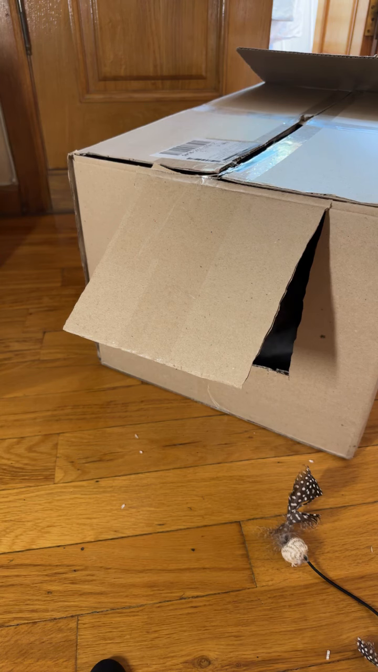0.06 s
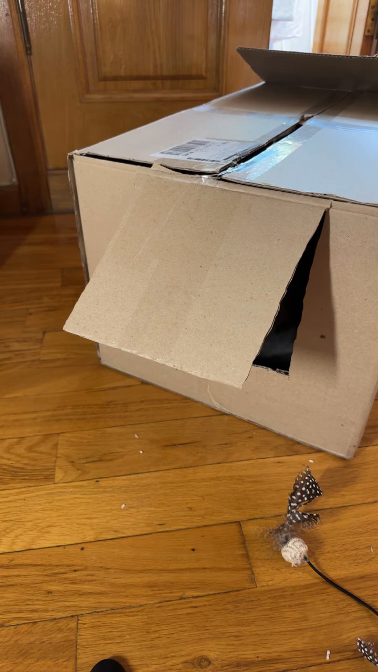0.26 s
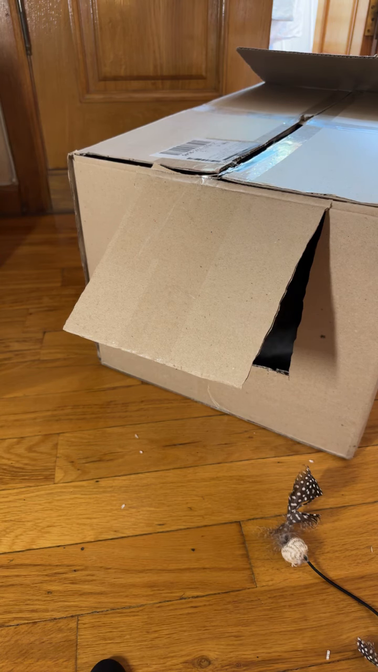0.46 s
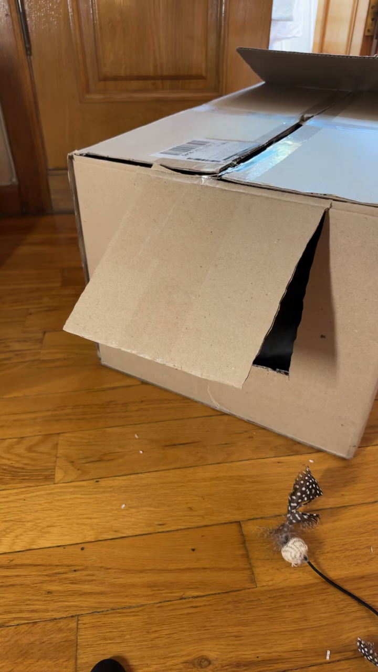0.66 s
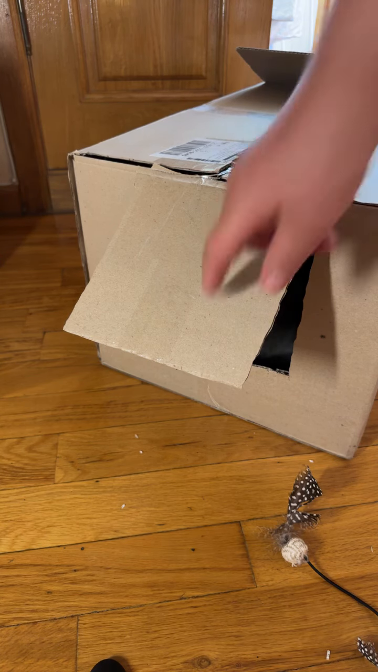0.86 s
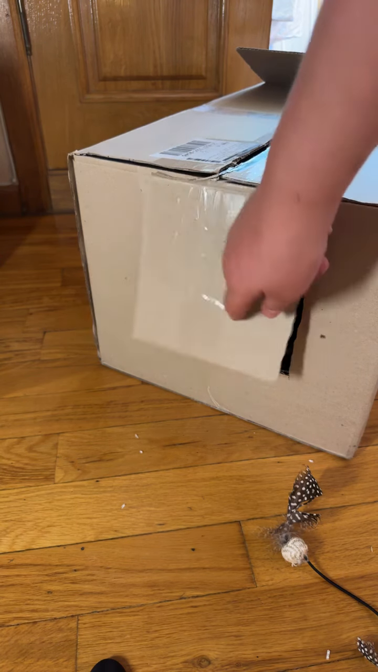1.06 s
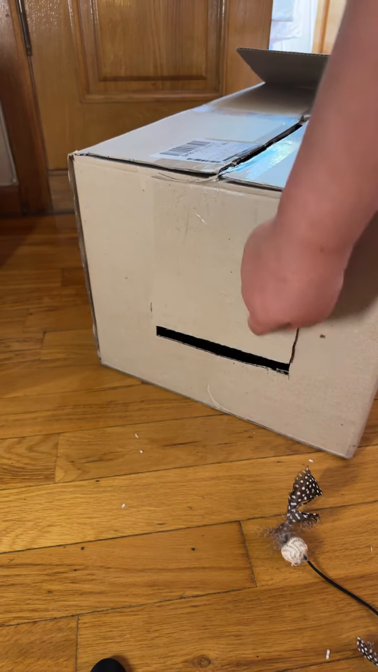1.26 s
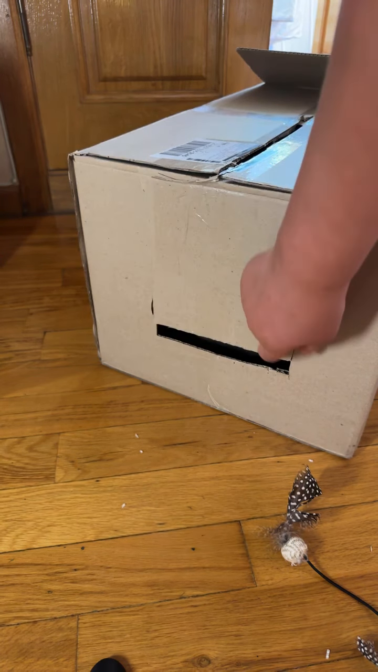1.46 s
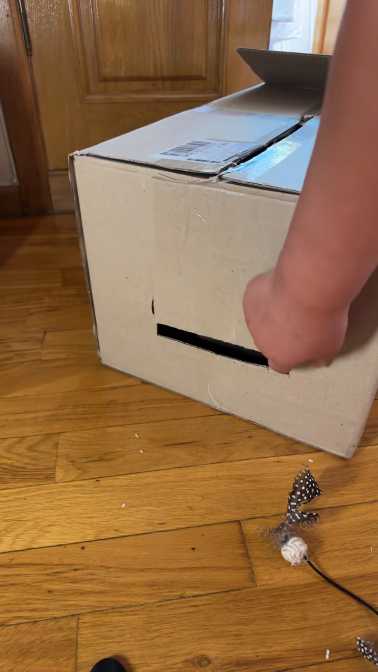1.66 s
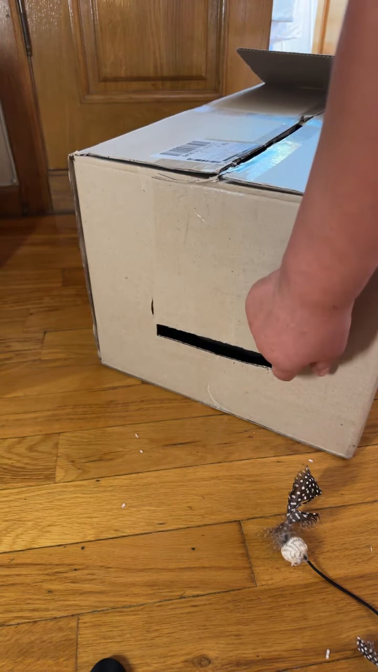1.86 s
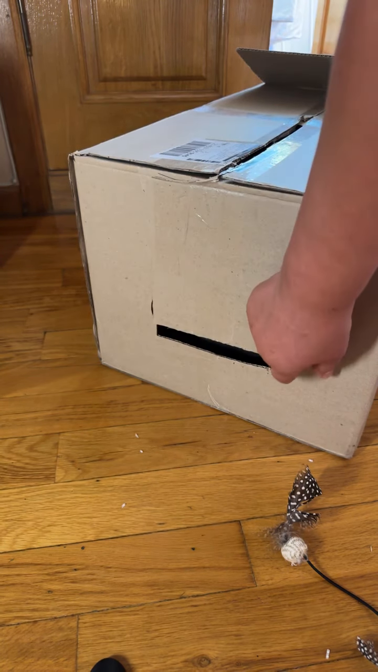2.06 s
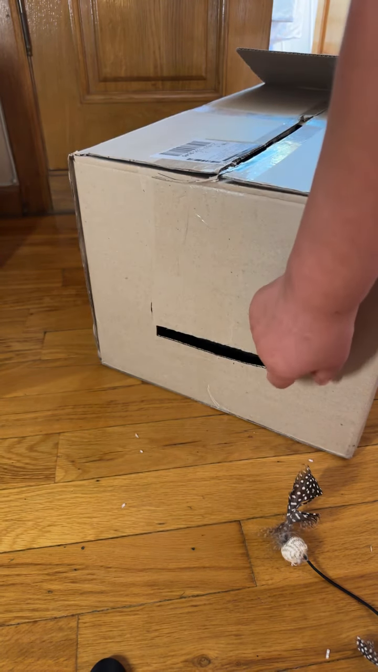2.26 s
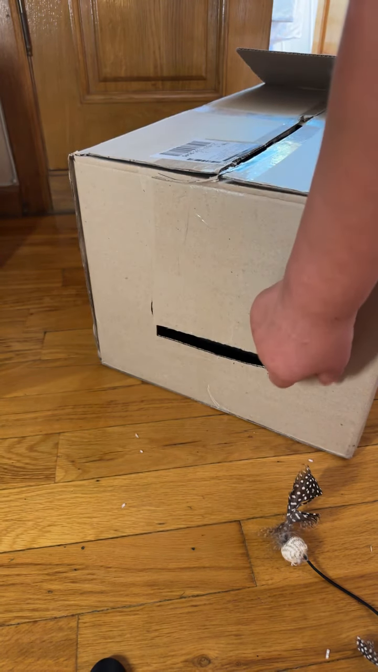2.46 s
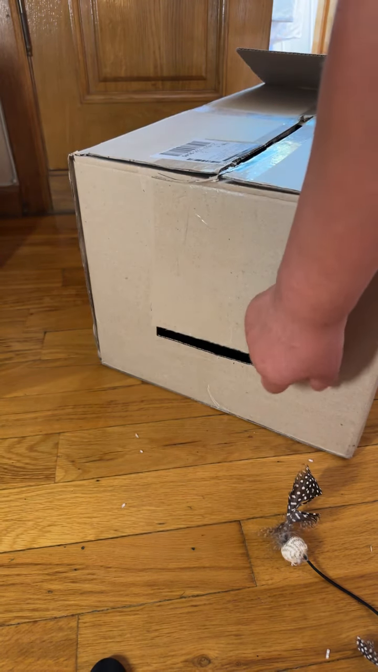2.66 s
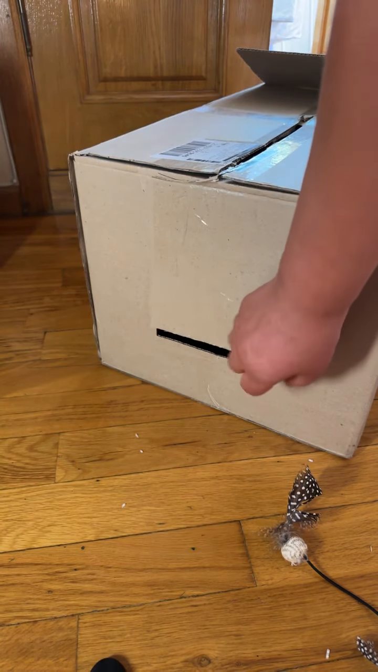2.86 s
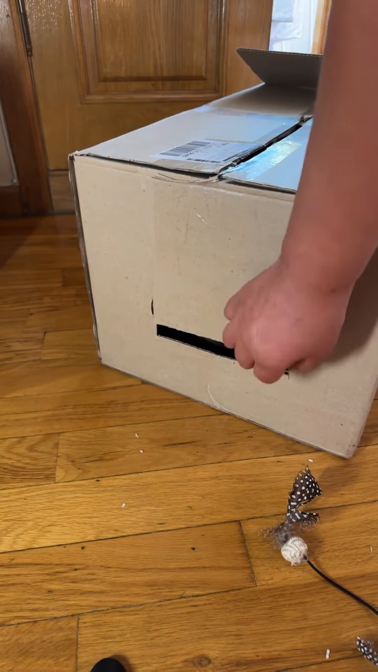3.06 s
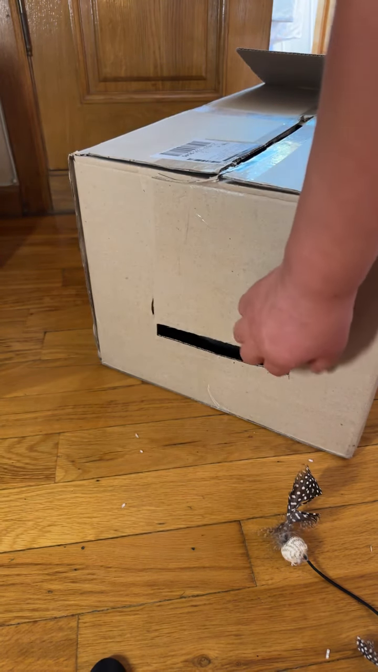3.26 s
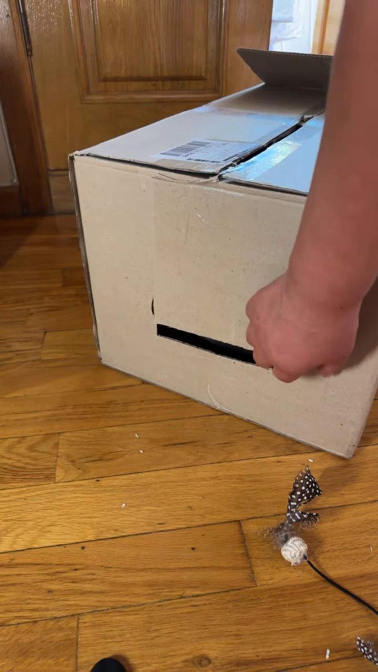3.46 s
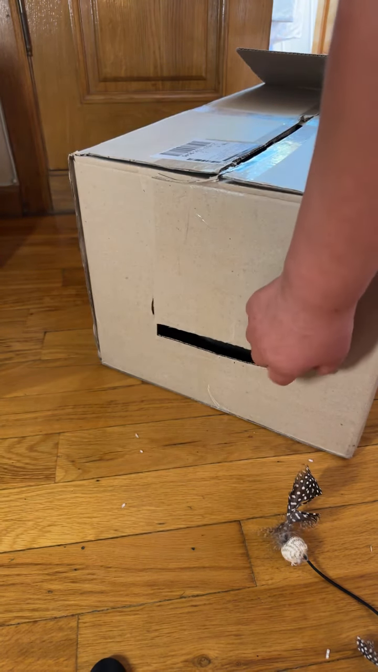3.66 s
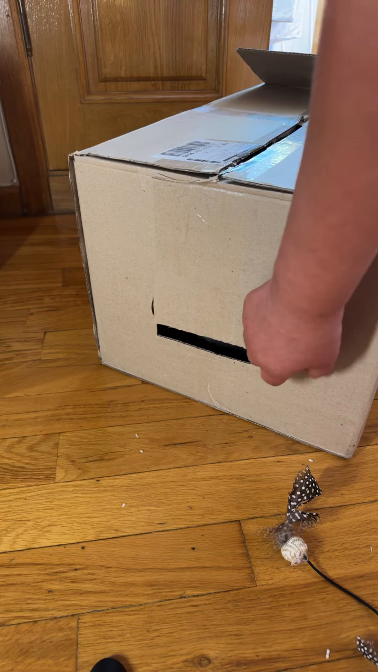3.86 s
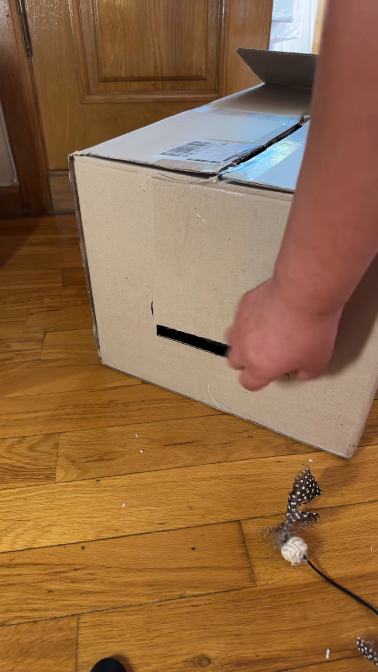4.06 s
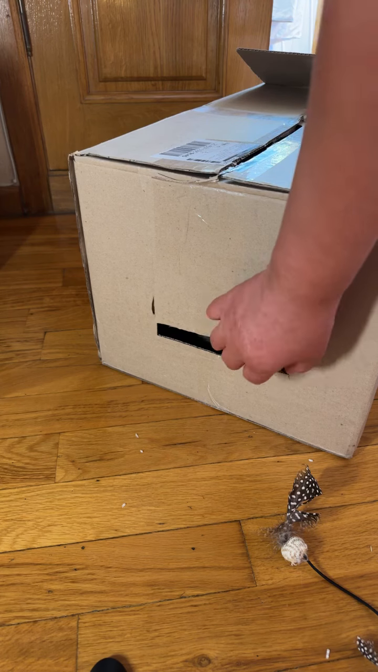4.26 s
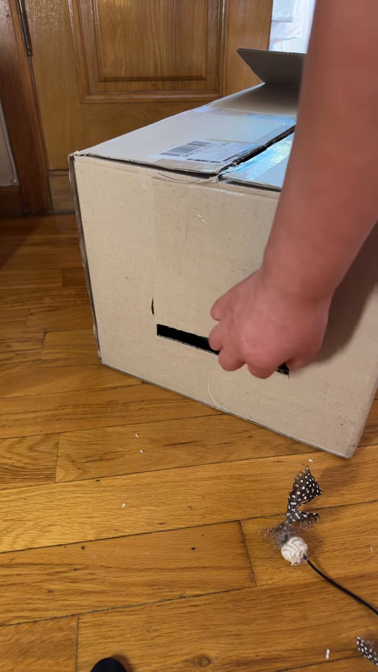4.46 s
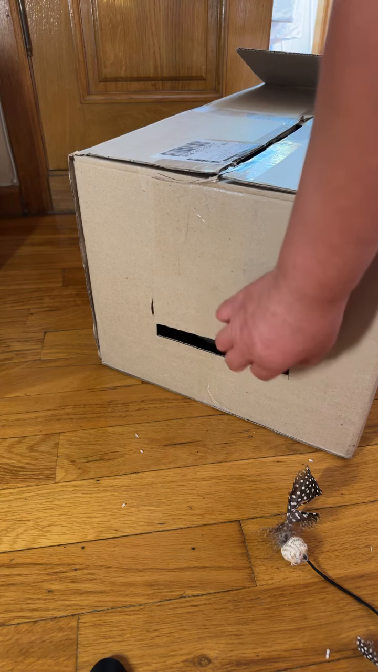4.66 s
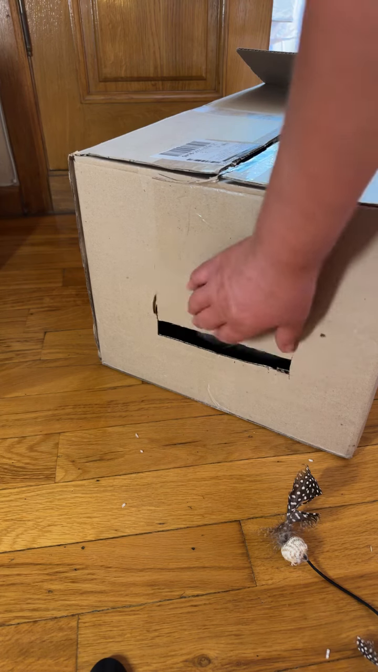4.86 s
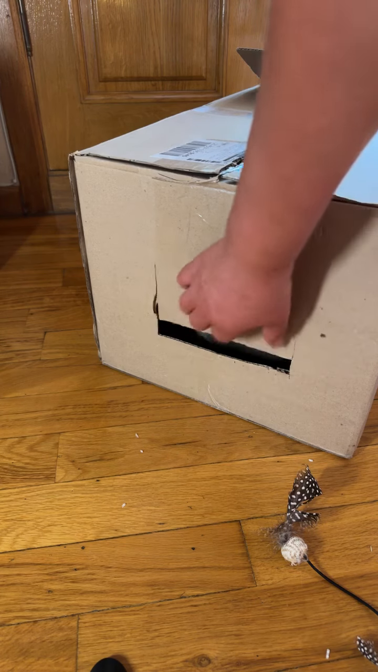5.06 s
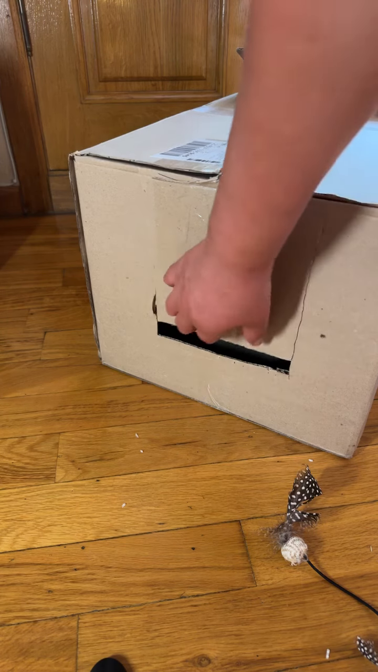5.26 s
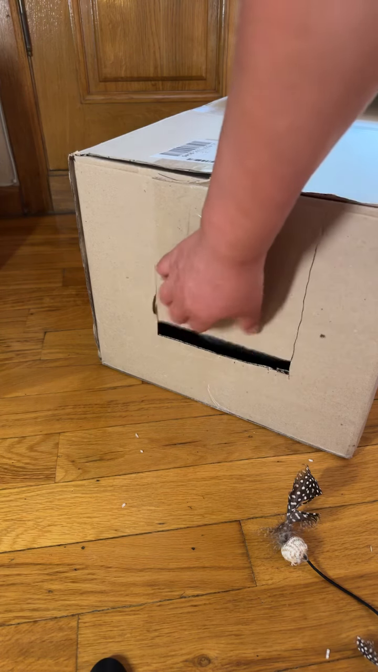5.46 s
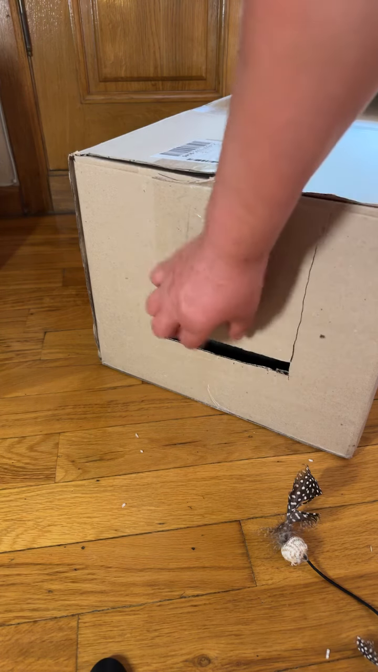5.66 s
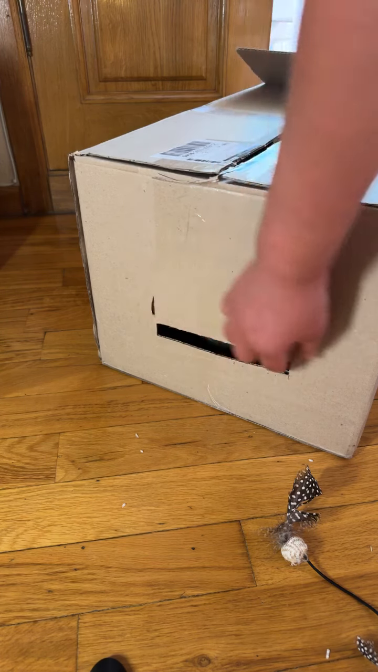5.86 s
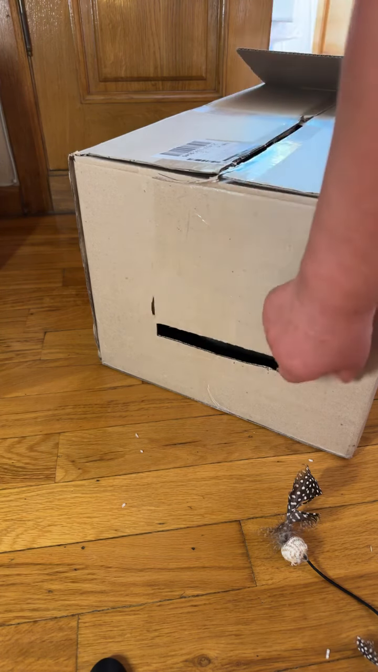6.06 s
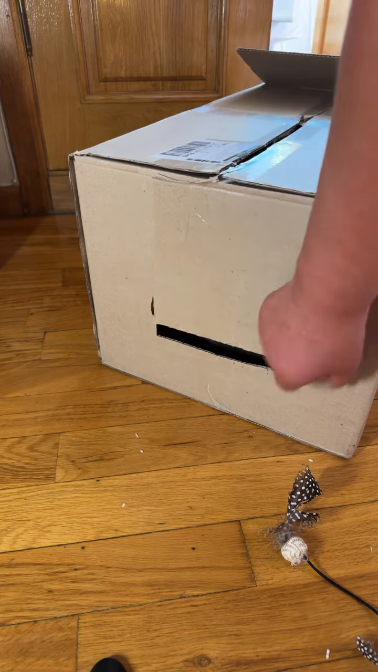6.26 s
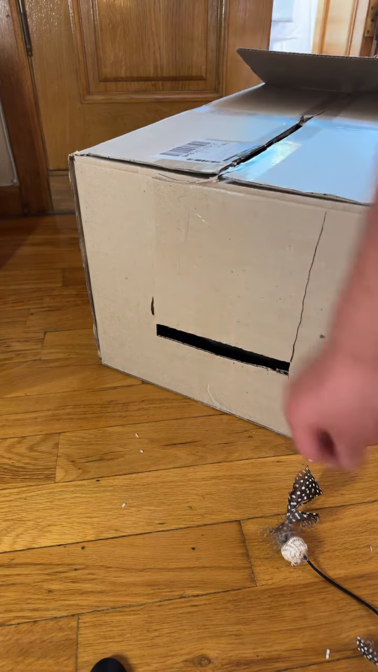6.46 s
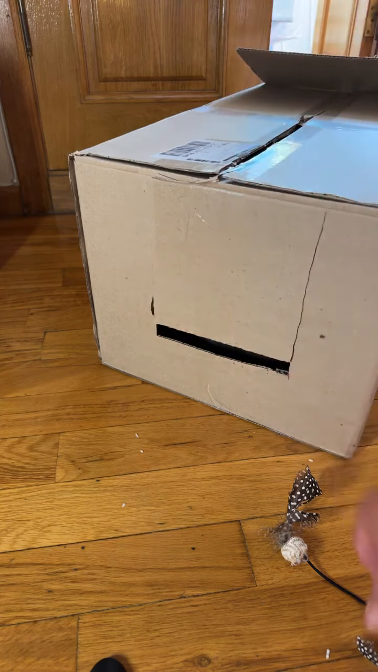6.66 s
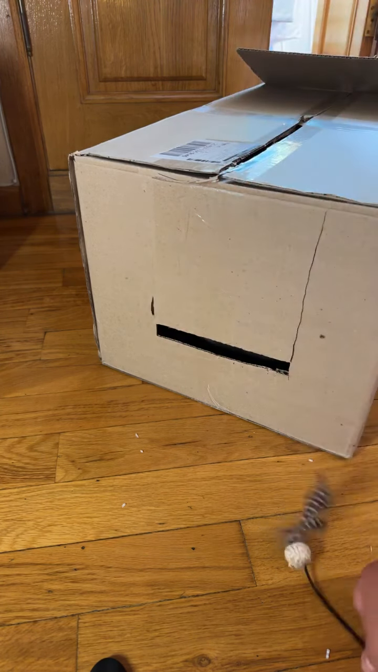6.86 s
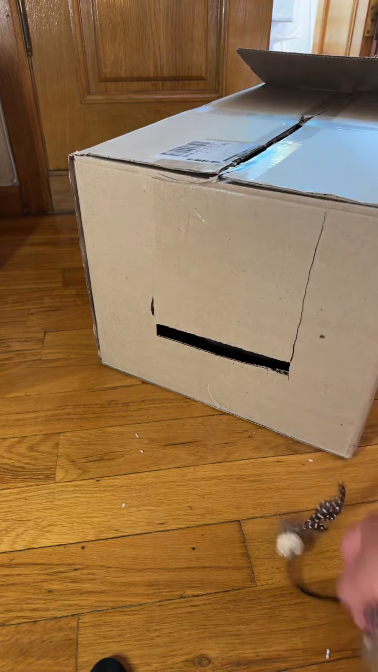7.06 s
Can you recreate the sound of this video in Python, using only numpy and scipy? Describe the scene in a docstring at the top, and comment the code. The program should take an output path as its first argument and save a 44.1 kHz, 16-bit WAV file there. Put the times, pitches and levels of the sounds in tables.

```python
"""Hand on a cardboard box, indoors

A hand pushes a cut flap shut on the side of the box, then fingers scratch, pick and tap at it.
Each contact sends a bending wave through the board, treble first; sliding nails make dense small slips.
The arm rubs softly as it moves. The wooden room answers every touch and adds its quiet drone and hiss;
at first a distant engine hums. All of it reaches one microphone, in mono."""
import sys
import numpy as np
from scipy import signal
from scipy.fft import rfft, irfft, next_fast_len
from scipy.io import wavfile
from scipy.ndimage import uniform_filter1d, map_coordinates

SR = 44100
rng = np.random.default_rng(int(sys.argv[2]) if len(sys.argv) > 2 else 0)


def dump_mix(stems):
    """Bounce the given channels to the path in sys.argv[1] as a 16-bit WAV at rate SR."""
    frames = np.atleast_2d(stems).T  # one column per channel
    limited = np.clip(frames, -1, 1)  # hard clip at full scale
    pcm = np.round(limited * 32767).astype(np.int16)
    wavfile.write(sys.argv[1], SR, pcm)


N = 313110

# the box's bass under a push: [f/Hz, relative level/dB]
BOOM_SPECTRUM = [(25, -33), (45, -17.5), (70, 0.5), (100, -9.5), (140, -6.5), (260, -58), (2000, -105)]
# a fingertip's dull knock on the panel: [f/Hz, relative level/dB]
KNOCK_SPECTRUM = [(50, -35), (120, -3), (180, -4.5), (300, -0.5), (400, -4.5), (600, -4.5), (900, -17.5),
                  (1500, -16), (3000, -72.5)]
# the treble of nails and breaking fibres: [f/Hz, relative level/dB]
CRACK_SPECTRUM = [(1200, -49), (2800, -4), (3900, 3), (5200, 0), (6500, 1.5), (8200, 0.5), (11000, 0),
                  (16000, -10.5)]
# a nail dragged over the paper: [f/Hz, relative level/dB]
SCRAPE_SPECTRUM = [(350, -54.5), (750, -1.5), (1000, 4), (1500, 4.5), (2200, -4.5), (3000, -16),
                   (4200, -38), (10000, -47)]


def amp(db):
    """Amplitude factor of a level in dB."""
    return 10 ** (np.asarray(db) / 20)


def unit(x):
    """x scaled to rms 1."""
    return x / np.sqrt(np.mean(x ** 2) + 1e-20)


def along(points, hz):
    """Interpolate (Hz, value) points on a log frequency axis."""
    f, values = np.transpose(points)
    return np.interp(np.log(hz + 1), np.log(f), values)


def curves(rows):
    """One value per sample for each column after the time."""
    s, *columns = np.transpose(rows)
    return [np.interp(np.arange(N) / SR, s, column) for column in columns]


def wobble(rate):
    """A smooth random curve, rate knots a second."""
    knots = rng.standard_normal(size=256)
    return map_coordinates(knots, [np.arange(N) * rate / SR], mode="mirror")


def during(rows, fade):
    """1 while a table lasts, with fades of that many seconds centred on its ends."""
    t = np.arange(N) / SR
    inside = np.minimum(t - rows[0][0], rows[-1][0] - t)
    return np.clip(inside / fade + .5, 0, 1)


def add(track, s, x):
    """Mix x into the track at s seconds."""
    i = max(round(s * SR), 0)
    track[i:i + len(x)] += x[:len(track) - i]


def filtered(x, response):
    """Multiply the spectrum of x by a response of frequency."""
    m = 2 * next_fast_len(len(x))
    return irfft(rfft(x, m) * response(np.fft.rfftfreq(m, 1 / SR)), m)[:len(x)]


def causal(db):
    """The minimum-phase response with these gains: it rings only after the force."""
    cepstrum = irfft(np.log(amp(db)))
    half = len(cepstrum) // 2
    folded = np.r_[cepstrum[0], 2 * cepstrum[1:half], np.zeros(half)]
    return np.exp(rfft(folded))


def background():
    """The room drones and hisses as shaped noise; a distant engine's two sines waver, rise and fade."""
    # distant engine: [t/s, f/Hz, level/dB]
    hum = [(0.0, 105.6, -52.5), (0.23, 109.2, -51.5), (0.52, 112.9, -53.5), (0.75, 123.7, -55)]
    # the room's low drone: [t/s, level/dB]
    drone_level = [(0.0, -57), (0.6, -69.5), (1.9, -69.5), (2.2, -57), (3.8, -63.5), (5.0, -53), (7.1, -58)]
    # colour of the drone: [f/Hz, relative level/dB]
    drone_spectrum = [(25, -21), (42, -5), (54, 4), (64, 14), (80, 5.5), (110, -38), (200, -77)]
    # colour of the steady room noise and hiss: [f/Hz, relative level/dB]
    quiet_spectrum = [(40, -68), (100, -11.5), (150, -15.5), (330, -19), (470, -27), (950, -27.5),
                      (2000, -38.5), (3500, -47.5), (5200, -47), (9500, -46.5), (12000, -57.5),
                      (16000, -58)]

    def noise(spectrum):
        """Steady noise of this colour at rms 1."""
        return unit(filtered(rng.standard_normal(N), lambda f: amp(along(spectrum, f))))

    hz, db = curves(hum)
    phase = 2 * np.pi * np.cumsum(hz) / SR
    tone = np.sin(phase) + amp(-9) * np.sin(phase / 2)  # with a fainter octave below
    engine = amp(db + 2.5 * wobble(rate=9)) * during(hum, fade=0.038) * tone
    quiet = amp(-57.5) * noise(quiet_spectrum)
    drone = amp(curves(drone_level)[0]) * noise(drone_spectrum)
    return quiet + drone + engine


def gesture(start, length, attack, release, swell_db, crest):
    """Pressure of one movement, at most 1: it takes hold, swells to a crest, eases and lets go."""
    t = np.arange(N) / SR - start
    arch = np.sin(np.interp(t, [0, length * crest, length], [0, np.pi / 2, np.pi]))
    onset = 1 - np.exp(-np.maximum(t, 0) / attack)
    letting_go = np.exp(-np.maximum(t - length, 0) / release)
    return onset * letting_go * amp(swell_db * (arch - 1))


def slips(rate, spread_db, clump_db, clump_rate=110):
    """Random tiny slips of uneven size, rate a second, bunched by stick and release, at rms 1."""
    signs = np.sign(rng.standard_normal(N))
    sizes = amp(spread_db * np.clip(rng.standard_normal(N), -2, 2)) * signs
    knots = rng.uniform(-1, 1, N)
    grip = np.interp(np.arange(N) * clump_rate / SR, np.arange(N), knots)
    happens = rng.random(N) < rate / SR
    return unit(sizes * amp(clump_db * grip) * happens)


def wandering(x, depth_db):
    """The favoured modes shift as the touch travels: a random gain over time and pitch, at rms 1."""
    z = signal.stft(x, nperseg=512)[2]
    field = uniform_filter1d(rng.standard_normal(z.shape), size=2, axis=0)  # across frequency
    field = uniform_filter1d(field, size=12, axis=1)  # across time
    return unit(signal.istft(z * amp(depth_db * unit(field)), nperseg=512)[1][:N])


def crunch(rise, fall, size=16384):
    """Fibres giving way in a burst of uneven little breaks (rise and fall in s)."""
    t = np.arange(size) / SR
    breaks = rng.standard_normal(size) * (rng.random(size) < .3)
    return breaks * np.exp(-t / fall) * (1 - np.exp(-t / rise))


def dying_noise(decays, size):
    """Noise of energy 1 in which each frequency dies at its own speed."""
    hz, t, z = signal.stft(rng.standard_normal(size), SR, nperseg=128)
    t60 = along(decays, hz)[:, None]
    tail = signal.istft(z * amp(-60 * t / t60), SR, nperseg=128)[1][:size]
    return tail / np.linalg.norm(tail)


def room_tail(onset=0.016, size=16384):
    """The room's diffuse answer, building up over some onset seconds as the walls reply."""
    # reverberation of the room: [f/Hz, t60/s]
    room_decay = [(80, 0.25), (250, 0.47), (1500, 0.46), (4000, 0.43), (9000, 0.4), (15000, 0.29)]
    build_up = 1 - np.exp(-(np.arange(size) / SR / onset) ** 2)
    return dying_noise(room_decay, size) * build_up


def ripple(hz, depth_db, spacing=3.163):
    """Every spot favours other modes: random gains in dB, further apart towards the treble."""
    place = np.sqrt(hz) / spacing
    gains = np.clip(rng.standard_normal(400), -1.8, 1.8)
    return depth_db * map_coordinates(gains, [place], mode="mirror") * hz / (hz + 500)


def rustle():
    """The moving arm rubs as a mass of tiny slips under swelling pressure, with a few light ticks."""
    # faint ticks as the hand moves about: [t/s, peak level/dB]
    ticks = [(0.1599, -41), (0.236, -38), (0.3215, -39), (0.3748, -41), (0.624, -38), (1.6594, -36),
             (3.882, -47.5), (5.433, -37.5), (7.015, -54)]
    # sweeps of the arm as it moves in and away: [t/s, length/s, level/dB]
    sweeps = [(0.127, 0.088, -52), (0.208, 0.25, -62.5), (0.598, 0.069, -59), (0.685, 0.15, -55.5),
              (0.96, 0.23, -56), (1.23, 0.13, -57), (1.417, 0.11, -61), (1.515, 0.15, -58),
              (1.726, 0.11, -61.5), (1.898, 0.028, -50), (6.92, 0.031, -60.5), (7.004, 0.027, -59.5)]
    # colour of the rubbing and the ticks: [f/Hz, relative level/dB]
    cloth_spectrum = [(250, -9), (420, 5.5), (900, -4), (1500, -3.5), (2400, -8), (3500, -8.5), (4200, -8),
                      (5000, -10.5), (6200, -10), (8000, -16.5), (10500, -18), (16000, -29.5)]
    level = np.zeros(N)
    for s, length, db in sweeps:
        level += amp(db) * gesture(s, length, attack=0.0073, release=0.18, swell_db=10.5, crest=0.72)
    many_slips = slips(rate=4000, spread_db=1.5, clump_db=2.5)
    rub = filtered(many_slips, lambda f: amp(along(cloth_spectrum, f)))
    out = level * wandering(rub, depth_db=4.0)
    for s, db in ticks:
        tick = crunch(rise=0.00079, fall=0.0051)
        tick = tick / np.linalg.norm(tick) + amp(0.5) * room_tail()
        tick = filtered(tick, lambda f: causal(along(cloth_spectrum, f) + ripple(f, depth_db=-3.0)))
        add(out, s, amp(db) * tick / np.abs(tick).max())
    return out


def board(x, spectrum, spot_db=0):
    """Colour a force by a spectrum, the panel's resonances and the spot where it acts."""
    # panel resonances that colour every contact: [f/Hz, width/Hz, peak level/dB]
    panel = [(176.3, 24.6, 8.5), (298, 26.7, 2), (368, 54, 5.5), (482.7, 3.9, 8), (556.4, 13, 0.5),
             (960, 60, 0.5), (1260, 280, -5.5), (1590, 80, -17), (2177, 210, -2), (3010, 190, -7.5)]

    def response(f):
        """Resonant peaks stand on a flat gain of 1."""
        peaks = sum(amp(db) / (1 + (2 * (f - hz) / width) ** 2) for hz, width, db in panel)
        return causal(along(spectrum, f) + 20 * np.log10(1 + peaks) + ripple(f, spot_db))

    return filtered(x, response)


def bending_wave(travel, scatter_db, fold_delay=0.0022, size=16384):
    """A pulse whose delay falls as 1 / sqrt(Hz) (travel s at 1 kHz), then its echoes from the folds."""
    # decay of the board: [f/Hz, t60/s]
    board_decay = [(70, 0.048), (200, 0.046), (600, 0.098), (2000, 0.05), (10000, 0.0076)]
    dispersion = lambda f: np.exp(-4j * np.pi * travel * np.sqrt(f * 10 ** 3))
    pulse = filtered(signal.unit_impulse(size), dispersion)
    build_up = 1 - np.exp(-(np.arange(size) / SR / fold_delay) ** 2)
    return pulse + amp(scatter_db) * dying_noise(board_decay, size) * build_up


def contact_part(wave, spectrum, wet_db, spot_db=-0.5, size=882):
    """One register of a contact with its diffuse room echo, scaled as if its energy fell within 20 ms."""
    in_room = wave / np.linalg.norm(wave) + amp(wet_db) * room_tail()
    x = board(in_room, spectrum, spot_db)
    return x / np.sqrt(np.sum(x ** 2) / size)


def skid(build, size=1500):
    """The nail skids in sparse slips whose force grows, e-fold in build seconds, until it lands."""
    t = np.arange(size) / SR
    grains = rng.standard_normal(size) * (rng.random(size) < .08)
    return grains * np.exp((t - t[-1]) / build)


def touches():
    """Rows (s, snap, knock, crack, boom in dB): more nail brightens a tap, more force brightens a snap."""
    # fingers landing on the panel: [t/s, knock level/dB, nail click over the knock/dB, boom level/dB]
    taps = [(0.9834, -43, -19, -42), (2.1349, -32, -16.5, -59), (2.1434, -32.5, -13, -48),
            (2.4123, -40, -50, -59), (2.7628, -33, -6.5, -30.5), (3.1509, -36.5, -30, -62),
            (3.5732, -39.5, -22, -58), (3.6111, -34, -22, -37), (4.0261, -36, -48, -62),
            (4.052, -35.5, -19, -63), (4.149, -36, -36, -48.5), (4.376, -38.5, -15, -38.5),
            (4.7516, -31, -14, -43.5), (5.0088, -31, -27, -47), (5.127, -41.5, -0.5, -54),
            (5.3891, -42.5, -20, -61), (6.0929, -27.5, -36.5, -56), (6.1803, -37.5, -15, -50),
            (6.274, -42.5, -42, -36.5), (6.327, -32, -18, -51)]
    # the flap's edge catching and springing free: [t/s, snap level/dB, knock level/dB, boom level/dB]
    springs = [(1.916, -46.5, -44, -57), (1.996, -45.5, -55, -51), (2.2366, -54, -34, -60),
               (2.7572, -39, -24.5, -39), (3.1782, -46, -43, -65), (4.4668, -49, -46, -36.5),
               (4.4952, -39.5, -45, -39.5), (4.9047, -38.5, -56, -40), (4.9176, -31, -30, -34.5),
               (4.995, -36, -30.5, -54), (5.1018, -36, -28.5, -27.5), (5.1246, -36.5, -39, -46),
               (5.248, -37, -33, -61), (5.2599, -37, -32, -41), (5.3198, -37.5, -32, -47),
               (5.445, -39.5, -34, -37.5), (5.5246, -38.5, -33.5, -34), (5.55, -34.5, -27, -46),
               (5.6336, -40, -42, -54), (5.8495, -48, -45.5, -42)]
    firm_snap_db, firm_crack_db = -36.5, -45  # a firm snap and the crack that goes with it
    crack_grows = 2.8  # dB of crack per dB of snap
    rows = []
    for s, knock_db, nail_db, boom_db in taps:
        midrange_db = knock_db + nail_db / 2 - 9  # 9 dB under the mean of knock and click
        rows.append((s, midrange_db, knock_db, knock_db + nail_db, boom_db))
    for s, snap_db, knock_db, boom_db in springs:
        crack_db = firm_crack_db + crack_grows * (snap_db - firm_snap_db)
        rows.append((s, snap_db, knock_db, crack_db, boom_db))
    return rows


def contacts():
    """Knock, boom and snap ride one bending wave; fibres crunch on top, after a short skid."""
    # midrange snap of a contact: [f/Hz, relative level/dB]
    snap_spectrum = [(350, -58), (750, -3.5), (1000, -2), (1600, 0.5), (2300, -1.5), (3200, -9),
                     (5000, -36.5), (10000, -59)]
    out = np.zeros(N)
    for s, snap_db, knock_db, crack_db, boom_db in touches():
        wave = bending_wave(travel=0.001831, scatter_db=-2.0)
        breaking = crunch(rise=0.00012, fall=0.0049)
        add(out, s, amp(knock_db) * contact_part(wave, KNOCK_SPECTRUM, wet_db=-4.0))
        add(out, s, amp(boom_db) * contact_part(wave, BOOM_SPECTRUM, wet_db=-2.5))
        add(out, s, amp(snap_db) * contact_part(wave, snap_spectrum, wet_db=-3.5))
        add(out, s, amp(crack_db) * contact_part(breaking, CRACK_SPECTRUM, wet_db=-2.5))
        # the stronger the crack, the louder the skid that leads up to it
        lead = skid(build=0.012)
        start = s - len(lead) / SR
        lead = np.r_[lead, np.zeros(len(lead))]  # time for the board to ring on
        add(out, start, amp(crack_db - 14) * unit(board(lead, SCRAPE_SPECTRUM)))
        add(out, start, amp(crack_db - 24) * unit(board(lead, CRACK_SPECTRUM)))
        add(out, start, amp(crack_db - 5) * unit(board(lead, KNOCK_SPECTRUM)))
    return out


def flap():
    """The closing flap pumps the air in the box, which booms softly as dying sines."""
    # the flap falls shut: [t/s, level/dB]
    shut_s, shut_db = (0.99, -38)
    # resonances of the air and walls: [f/Hz, relative level/dB, t60/s]
    cavity = [(74.6, -10, 0.84), (119, -7, 0.64), (161.7, 8, 0.3)]
    out, t = np.zeros(N), np.arange(SR // 2) / SR
    ring = sum(amp(db - 60 * t / t60) * np.sin(2 * np.pi * hz * t) for hz, db, t60 in cavity)
    add(out, shut_s, amp(shut_db) * ring * (1 - np.exp(-t / 0.0015)))
    return out


def scratching():
    """Nails catch on the paper's fibres while the fingertips judder over the flutes."""
    # fingers drawn over the board:
    # [t/s, length/s, fingertip drag level/dB, nail scrape level/dB, paper hiss level/dB]
    strokes = [(2.091, 0.11, -47, -53, -62), (2.254, 0.19, -51, -65, -70), (2.527, 0.073, -41.5, -61, -65),
               (2.67, 0.085, -52.5, -78, -91), (2.912, 0.065, -40.5, -45.5, -59),
               (2.959, 0.084, -44, -49.5, -58.5), (3.12, 0.053, -45, -51, -57.5),
               (3.165, 0.043, -38, -39.5, -56.5), (3.207, 0.075, -39, -45.5, -61),
               (3.332, 0.1, -53.5, -58, -72), (3.468, 0.082, -60, -60, -70.5),
               (3.552, 0.083, -36.5, -48.5, -55.5), (3.783, 0.058, -46.5, -62.5, -70),
               (3.876, 0.048, -49.5, -60, -69), (3.984, 0.041, -46, -59, -61.5),
               (4.016, 0.054, -32, -47.5, -56.5), (4.091, 0.1, -54, -46, -59),
               (4.148, 0.11, -41.5, -41.5, -55), (4.456, 0.073, -39, -32.5, -45.5),
               (4.538, 0.13, -43, -55, -65), (4.654, 0.058, -42, -38, -50.5), (4.708, 0.052, -46, -44, -52),
               (5.518, 0.052, -24.5, -31.5, -41), (5.577, 0.045, -46, -57, -54),
               (5.838, 0.065, -39.5, -38.5, -59), (5.9, 0.051, -42.5, -60, -61),
               (5.973, 0.072, -44, -58, -68), (6.11, 0.092, -40.5, -57, -64), (6.347, 0.025, -47, -55, -65)]
    levels = np.zeros((3, N))
    for s, length, *levels_db in strokes:
        pressure = gesture(s, length, attack=0.009, release=0.012, swell_db=8, crest=0.62)
        levels += amp(levels_db)[:, None] * pressure
    drag, scrape, hiss = levels
    catches = slips(rate=750, spread_db=2, clump_db=0.5)
    fine_slips = slips(rate=3000, spread_db=-1, clump_db=5.5)
    x = scrape * wandering(board(catches, SCRAPE_SPECTRUM), depth_db=3)
    x += drag * wandering(board(catches, KNOCK_SPECTRUM), depth_db=2.5)
    x += amp(-16.5) * drag * unit(board(catches, BOOM_SPECTRUM))
    x += hiss * wandering(board(catches + fine_slips, CRACK_SPECTRUM), depth_db=5.5)
    return x + amp(-6.0) * signal.fftconvolve(x, room_tail())[:N]


def scene():
    """All sources summed at the one microphone."""
    return (background() + rustle() + contacts() + flap() + scratching())[None]


def record(dry, low_hz=44, top_hz=16400):
    """The recorder cuts the deepest bass and keeps nothing above its band limit."""
    def response(f):
        """A steep low cut, 3 dB down at low_hz - 5, and a sharp top edge."""
        low_cut_db = -10 * np.log10(1 + (low_hz / (f + 5)) ** 8)
        return causal(low_cut_db) * (f < top_hz)

    return np.array([filtered(x, response) for x in dry])


dry = scene()
out = record(dry)
dump_mix(out)
```